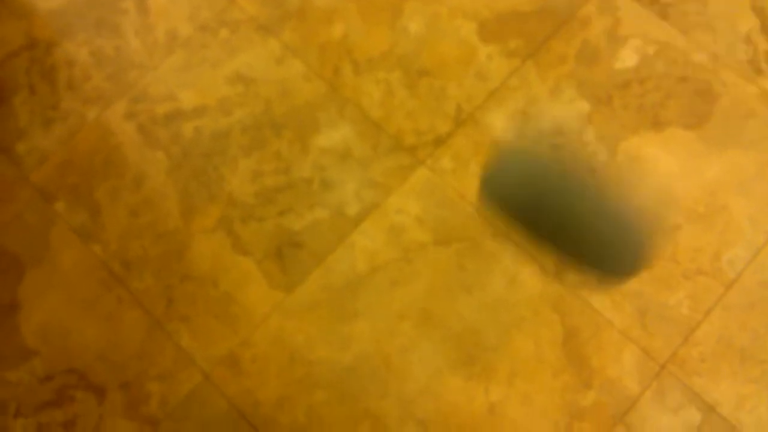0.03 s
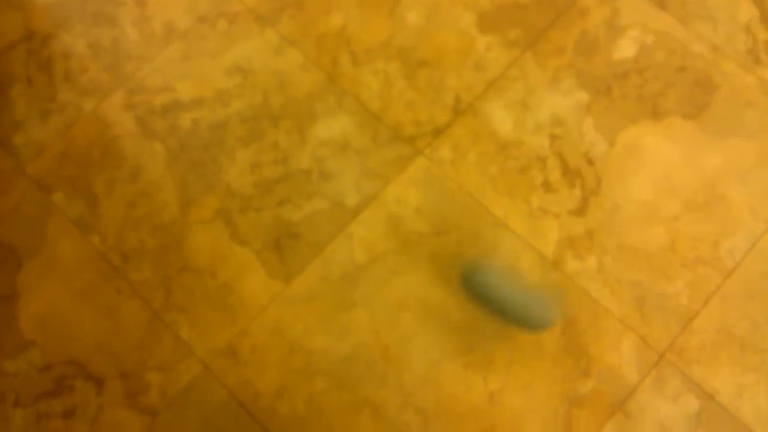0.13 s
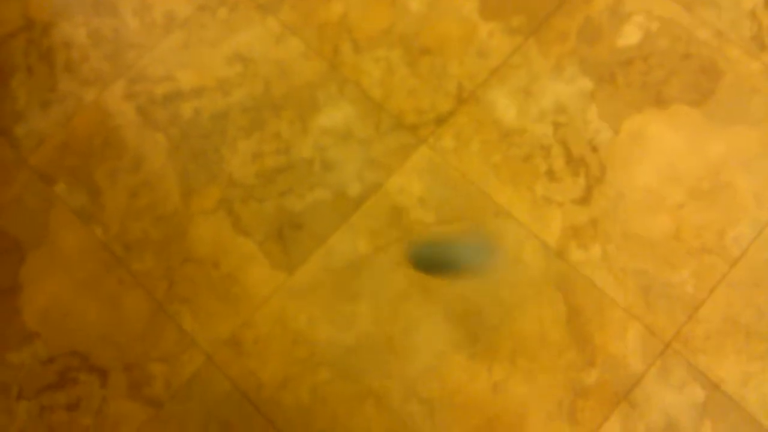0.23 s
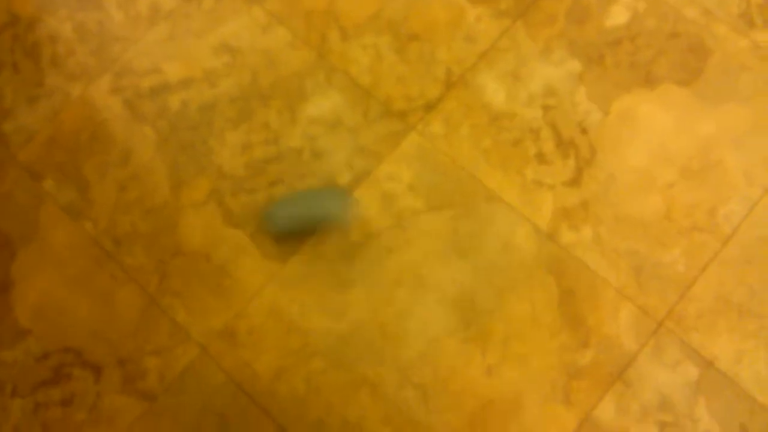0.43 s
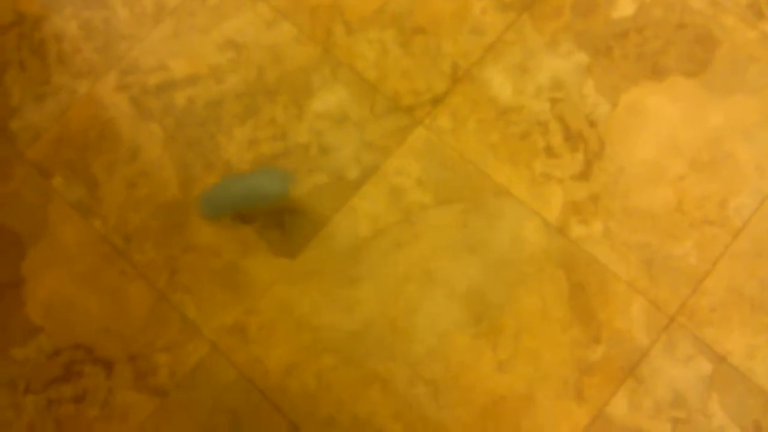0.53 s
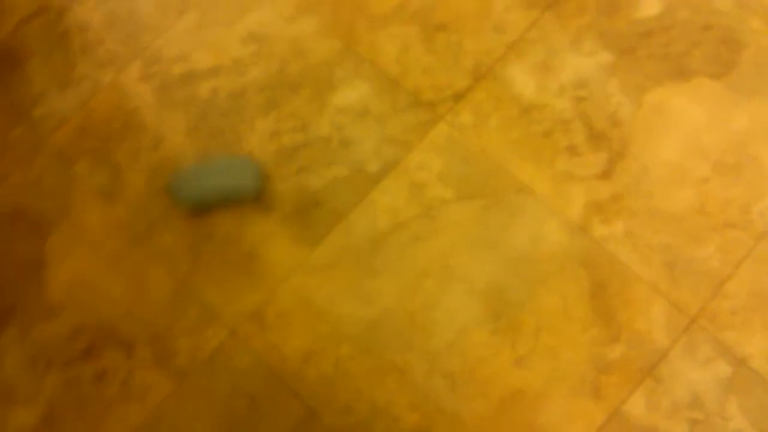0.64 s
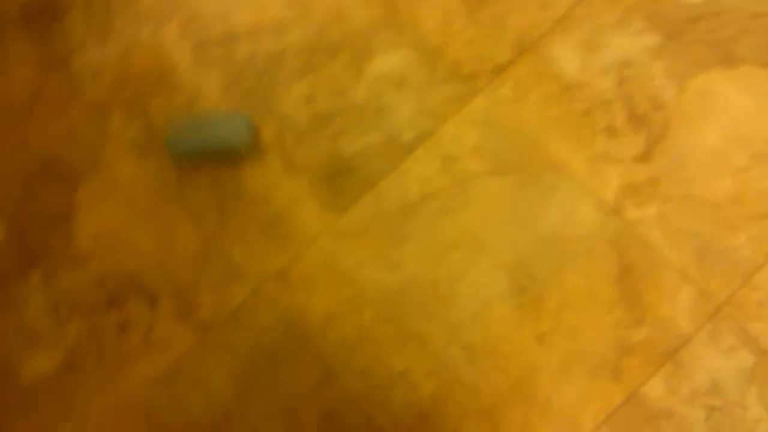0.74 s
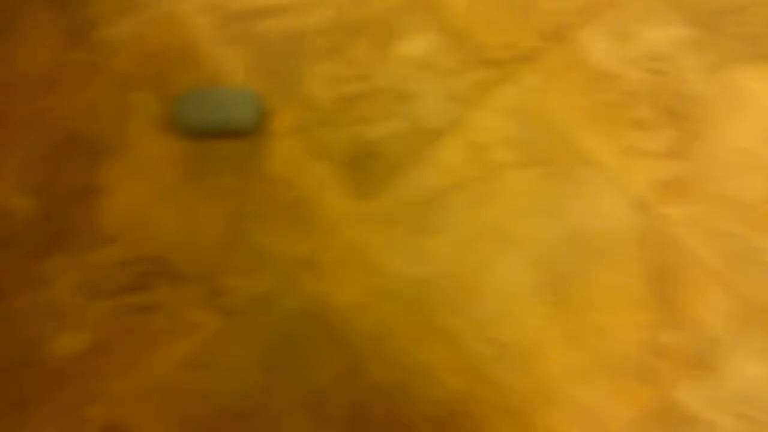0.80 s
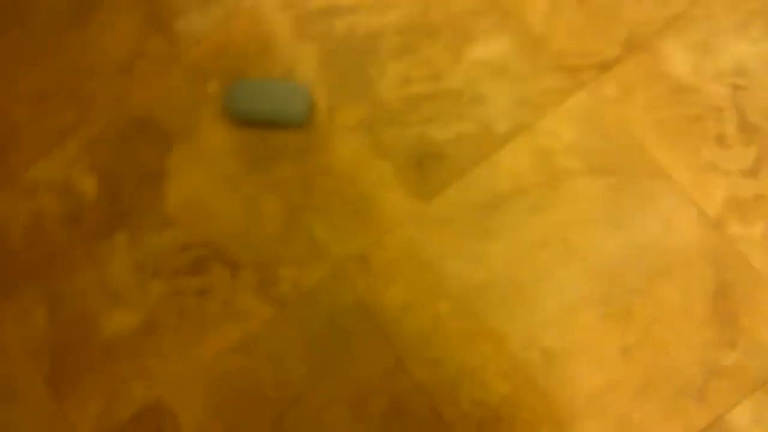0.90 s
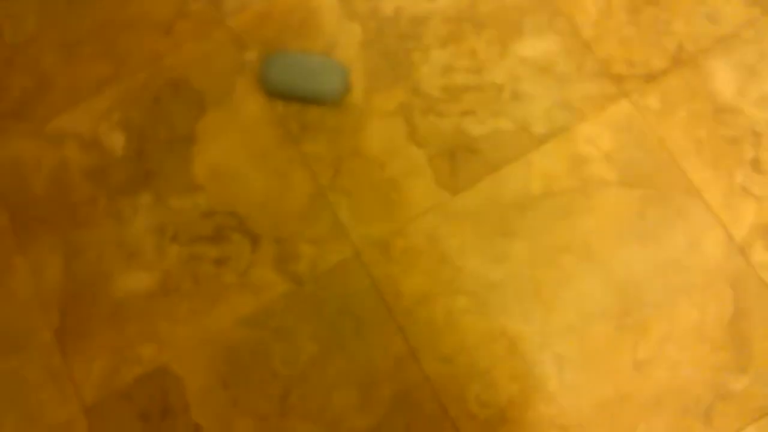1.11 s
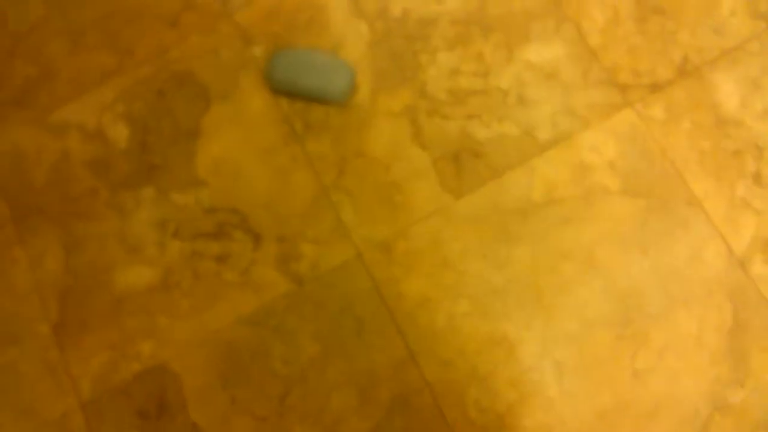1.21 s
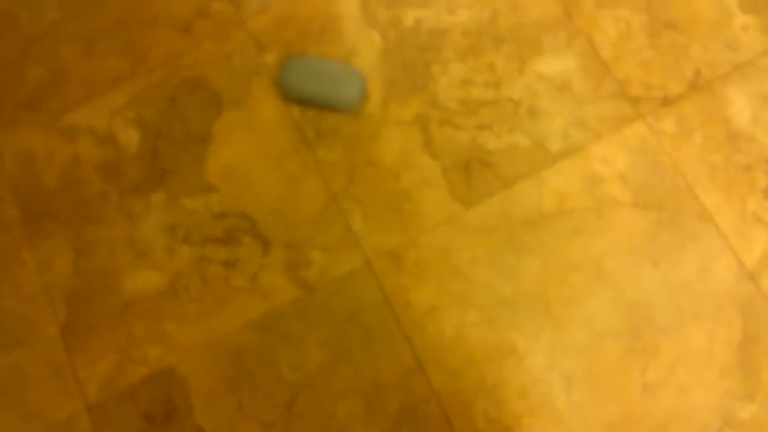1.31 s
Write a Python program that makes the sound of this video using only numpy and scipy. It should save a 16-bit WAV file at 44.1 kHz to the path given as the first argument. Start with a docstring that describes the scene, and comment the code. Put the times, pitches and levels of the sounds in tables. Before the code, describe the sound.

A bar of soap hits a tile floor at about 0.2 seconds with a sharp knock and a brief high ping, slightly overloading the microphone. It lands again with a double knock at 0.5 seconds, then clatters in quicker, lighter taps from 0.7 seconds, coming to rest near 1.1 seconds. The small, hard room adds a short, bright echo, with faint rumble, hiss and hum underneath.

```python
"""In a small, hard room with a tile floor, a bar of soap falls, bounces and clatters to rest.
Each impact is a brief pulse, heard as a knock, that excites damped modes of the tile and the bar.
The room responds with early reflections, a bright diffuse tail and standing waves.
The first, hardest blow adds a high ping and overloads the microphone.
A faint rumble, hiss and hum lie underneath."""
import sys
import numpy as np
from scipy import signal
from scipy.fft import rfft, irfft
from scipy.io import wavfile

SR = 44100
rng = np.random.default_rng(int(sys.argv[2]) if len(sys.argv) > 2 else 0)


def store_pcm(level_fs):
    """Save levels as 16-bit WAV."""
    pcm = np.round(np.clip(level_fs, -1, 1) * 32767).astype(np.int16)
    wavfile.write(sys.argv[1], SR, np.atleast_2d(pcm).T)


N = 59535

# Background noise spectrum: f/Hz, relative level/dB
NOISE_SPECTRUM = [(8.8, -28.5), (15, -2), (68, -16), (112, -23), (169, -44), (201, -25), (262, -35),
                  (294, -26), (321, -38), (405, -29), (726, -44), (1190, -49), (1420, -50.5), (8930, -60),
                  (16000, -54)]
# Impacts: t/s, strength/dB, bass/dB, treble/dB, fizz/dB, tile ring/dB, bar ring/dB,
# reverberation/dB, first echo delay/s
IMPACTS = [ (0.2412, 6, -4, 2.5, 4.5, 3, -26, 4.5, 0.0042), (0.5073, 2, -1, -0.5, -6, 3.5, -3, -2, 0.0049),
           (0.5318, 1, 1, 1.5, 7.5, -6.5, -12, -3, 0.0049),
           (0.6780, -8.5, 5, -3.5, 2.5, -28, -18, 2.5, 0.015),
           (0.7640, -13, -4, -7, 2.5, 7.5, -8, 3, 0.0053), (0.7660, -13, -6, -7.5, 3.5, 6, -13, -4, 0.0055),
           (0.8110, -11.5, -3, -11, -1, -0.5, -7, 2.5, 0.0066), (0.8250, -13, 3, -18, -4, -2, 1, 0, 0.0059),
           (0.8711, -23.5, -12, -2.5, -15, -17, 8, -15, .0060),
           (0.8888, -7, -8, 8.5, 0, -19, 12, 1.5, 0.0051), (0.9580, -10.5, -4, 3, -2.5, -19, 0, 1.5, 0.007),
           (1.0115, -16, -2, 0, 2.5, -18, 12.5, 2, 0.007), (1.0440, -28.5, 5, -2.5, 4, -2, -7, 9, 0.0047),
           (1.0620, -22.5, 5.5, 0, -8, -7, -6, 2.5, .0060), ]
# Spectrum of one knock: f/Hz, relative level/dB
KNOCK_SPECTRUM = [(40, -13), (100, 7.5), (150, -1.5), (210, 15.5), (400, 18.5), (900, 15), (1400, 18),
                  (2100, 12.5), (2900, 10), (3700, 6.5), (4600, 13), (5200, 9.5), (6000, 14), (7500, 8),
                  (9000, -1), (10800, -5), (12500, -4), (16000, -8.5)]
# Modes of the tile, the bar and the high ping: f/Hz, relative initial level/dB, T60/s
TILE_MODES = [(1198, -28, .03), (1372, -30, 0.022), (1556, -27.5, 0.02), (1865, -25.5, 0.02)]
BAR_MODES = [(2402, -27, 0.029), (2532, -22, 0.046), (4447, -23.5, 0.0066), (5870, -24, 0.018)]
PING_MODES = [(6870, -19.5, .02), (7270, -10.5, 0.026), (7590, -21, .02)]
# Decay of the diffuse tail: f/Hz, T60/s
TAIL_T60 = [(100, .5), (260, 0.26), (700, 0.38), (1800, 0.2571), (4800, .31), (7300, 0.2551), (10000, 0.27),
            (15000, 0.06)]
# Spectrum of the diffuse tail: f/Hz, relative level/dB
TAIL_SPECTRUM = [(100, 10), (300, 0), (800, -1), (2000, -0.5), (4000, -3), (7000, -1.5), (13000, 1)]
# Standing waves of the room: f/Hz, relative peak gain/dB, T60/s
STANDING_WAVES = [(196.4, 11, .4), (233.3, 6, .4), (291.2, 10.5, 0.45), (359.2, 15.5, 0.51),
                  (447.4, 3.5, 0.32), (569.4, 9.5, .48), (819, 8.5, 0.44), (1095, -0.5, .34),
                  (1190, 1, 0.31), (1271, 5, 0.34), (1356, 5.5, .3), (1834, 0.5, 0.34), (1956, 3, 0.25),
                  (2030, 12.5, 0.33)]
# Reflections from the farther walls: delay/s, level/dB
WALL_ECHOES = [(.0110, -11), (0.0149, -15)]

NOISE_DB, HUM_HZ, HUM_DB = -43, 57.9, -53.5
BASS_HZ, BODY_HZ, TREBLE_HZ, FIZZ_HZ = 327, 1290, 4420, 11000
PING_DELAY_S, FIRST_ECHO_DB = 0.003, -10.5
TAIL_START_S, TAIL_BUILD_S = 0.0014, 0.0043
OVERLOAD, KNEE, CUTOFF_HZ = 1.02, 4.3, 15900


def amp(db):
    """Amplitude grows tenfold for every 20 dB."""
    return 10 ** (np.asarray(db) / 20)


def curve_at(points, hz):
    """Linear interpolation on a logarithmic frequency axis."""
    f, value = np.transpose(points)
    return np.interp(np.log(hz + 1), np.log(f + 1), value)


def add(mix, start_s, sound):
    """Superposition: a delayed sound adds linearly to the mix."""
    part = mix[max(round(start_s * SR), 0):][:len(sound)]
    part += sound[:len(part)]


def background():
    """Spectral shaping turns white noise into rumble and hiss; a pure tone supplies the hum."""
    hz = np.fft.rfftfreq(N, 1 / SR)
    noise = irfft(rfft(rng.standard_normal(N)) * amp(curve_at(NOISE_SPECTRUM, hz)), N)
    hum = np.sqrt(2) * np.sin(2 * np.pi * (HUM_HZ * np.arange(N) / SR + rng.random()))
    return amp(NOISE_DB) * noise / noise.std() + amp(HUM_DB) * hum


def knock(spectrum_db, size=2048):
    """Minimum phase gives the most compact causal pulse with a given spectrum."""
    log_gain = np.log(amp(np.concatenate([spectrum_db, spectrum_db[-2:0:-1]])))
    log_spectrum = np.conj(signal.hilbert(log_gain))
    return np.fft.ifft(np.exp(log_spectrum)).real[:size]


def ring(modes, size=2048):
    """Free vibration of a struck body is a sum of exponentially damped sinusoids."""
    t = np.arange(size) / SR
    return sum(amp(db - 60 * t / t60) * np.sin(2 * np.pi * hz * t) for hz, db, t60 in modes)


def impact(bass_db, treble_db, fizz_db, tile_db, bar_db, size=4096):
    """Impulsive excitation: a knock, coloured by how the bar lands, with the ring of tile and bar."""
    hz = np.fft.rfftfreq(size, 1 / SR)
    landing = [(BASS_HZ, bass_db), (BODY_HZ, 0), (TREBLE_HZ, treble_db), (FIZZ_HZ, fizz_db)]
    pulse = knock(curve_at(KNOCK_SPECTRUM, hz) + curve_at(landing, hz))
    return pulse + amp(tile_db) * ring(TILE_MODES) + amp(bar_db) * ring(BAR_MODES)


def diffuse_tail(size, frame=256, spacing=8):
    """A diffuse field: dense random reflections decay exponentially, each band at its own rate."""
    reflections = np.zeros(size)
    slots = np.arange(0, size, spacing)
    signs = rng.choice([-1., 1.], len(slots))
    reflections[slots + rng.integers(0, spacing, len(slots))] = signs * np.sqrt(spacing)
    hz, t, bands = signal.stft(reflections, SR, nperseg=frame)
    tau = curve_at(TAIL_T60, hz)[:, None] / np.log(1000)
    decay = np.exp(-t / tau) * np.sqrt(2 / (tau * SR))  # unit energy in each band
    colour = amp(curve_at(TAIL_SPECTRUM, hz))[:, None]
    return signal.istft(bands * decay * colour, SR, nperseg=frame)[1][:size]


def room(reverb_db, echo_s, size=32768):
    """The impulse response sums the diffuse tail, standing waves, direct sound and wall echoes."""
    t = np.arange(size) / SR
    reverb = diffuse_tail(size)
    for hz, db, t60 in STANDING_WAVES:
        tau = t60 / np.log(1000)
        reverb += amp(db) * 2 / (tau * SR) * np.exp(-t / tau) * np.cos(2 * np.pi * hz * t)
    build_up = np.clip((t - TAIL_START_S) / TAIL_BUILD_S, 0, 1)
    response = amp(reverb_db) * reverb * build_up
    for delay_s, db in [(0, 0), (echo_s, FIRST_ECHO_DB)] + WALL_ECHOES:
        add(response, delay_s, amp([db]))
    return response


def bouncing_soap():
    """Convolution gives each impact the room response of its own spot; the hardest also pings."""
    bounces = np.zeros(N)
    hardest_db = max(row[1] for row in IMPACTS)
    for start_s, db, bass_db, treble_db, fizz_db, tile_db, bar_db, reverb_db, echo_s in IMPACTS:
        blow = impact(bass_db, treble_db, fizz_db, tile_db, bar_db)
        if db == hardest_db:
            add(blow, PING_DELAY_S, ring(PING_MODES))
        add(bounces, start_s, amp(db) * signal.fftconvolve(blow, room(reverb_db, echo_s)))
    return bounces


def scene():
    """The pressures of the bounces and the background superpose in one channel."""
    return (bouncing_soap() + background())[None]


def record(dry):
    """Saturation in the microphone rounds the highest peaks; a low-pass filter limits the band."""
    saturated = dry / (1 + abs(dry / OVERLOAD) ** KNEE) ** (1 / KNEE)
    low_pass = signal.firwin(255, CUTOFF_HZ, window=("kaiser", 8), fs=SR)
    return signal.oaconvolve(saturated, low_pass[None], "same")


dry = scene()
out = record(dry)
store_pcm(out)
```